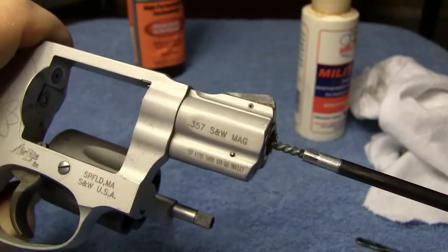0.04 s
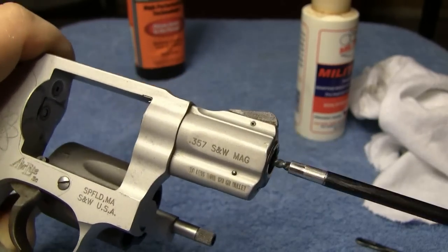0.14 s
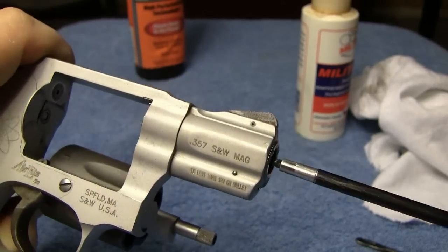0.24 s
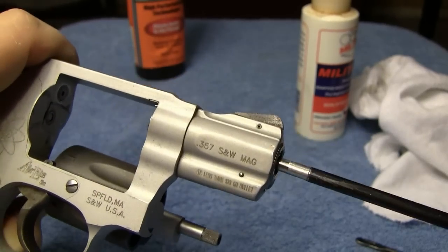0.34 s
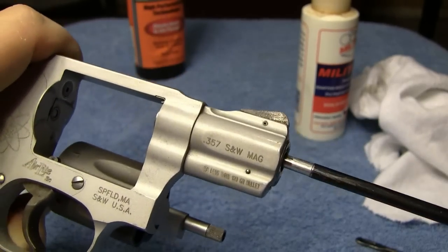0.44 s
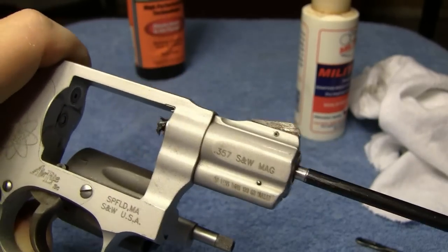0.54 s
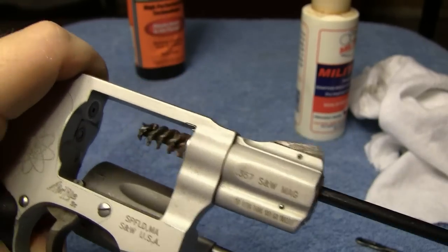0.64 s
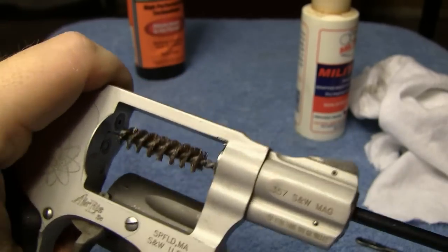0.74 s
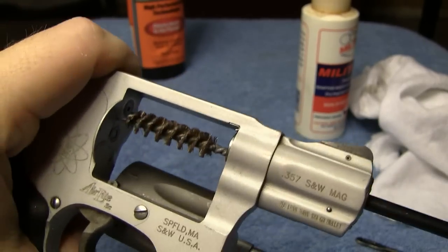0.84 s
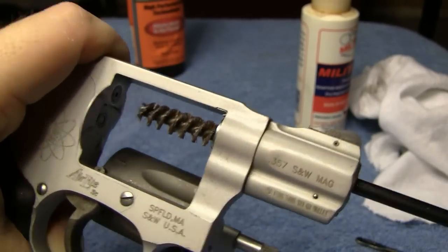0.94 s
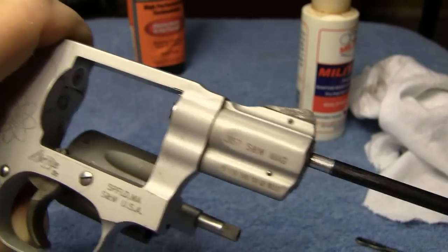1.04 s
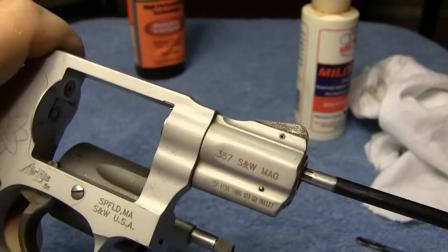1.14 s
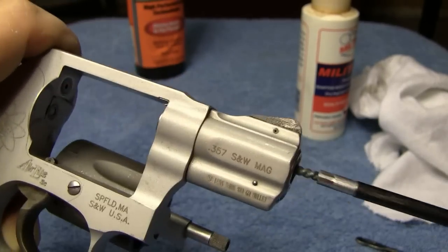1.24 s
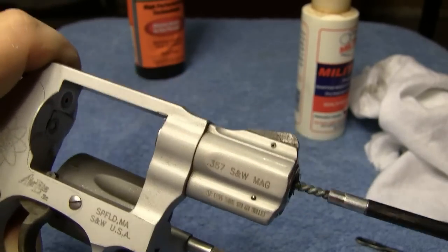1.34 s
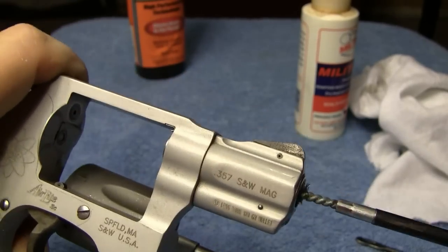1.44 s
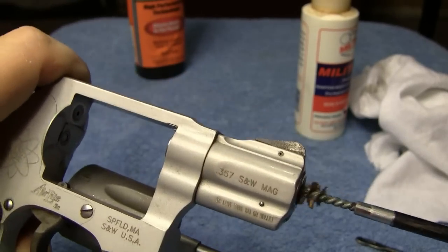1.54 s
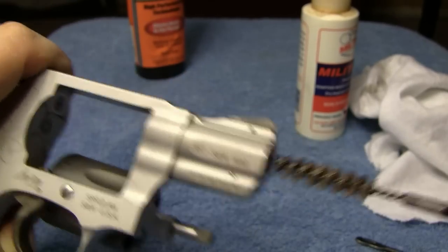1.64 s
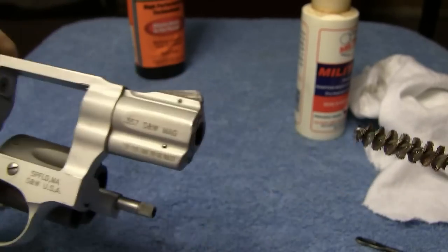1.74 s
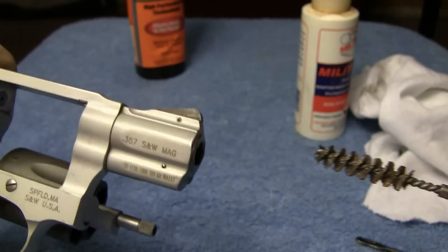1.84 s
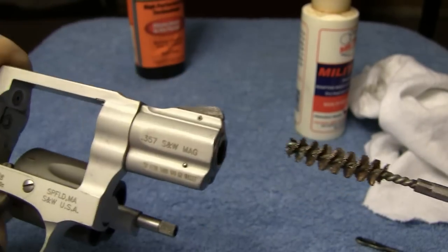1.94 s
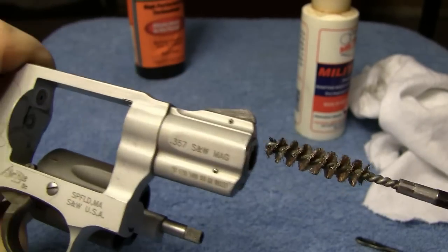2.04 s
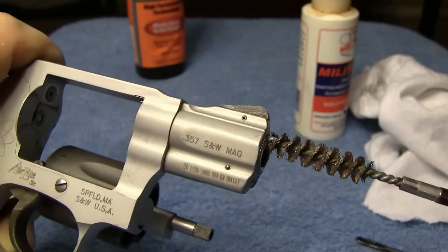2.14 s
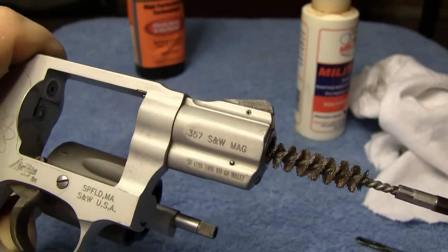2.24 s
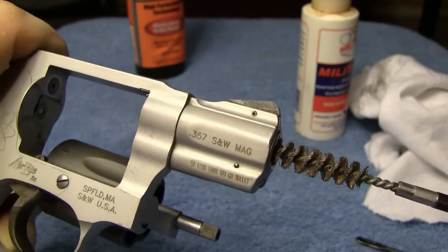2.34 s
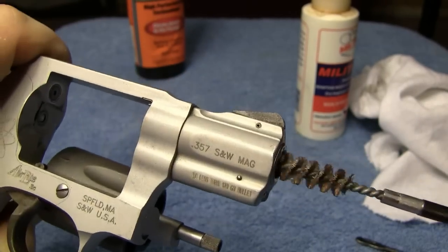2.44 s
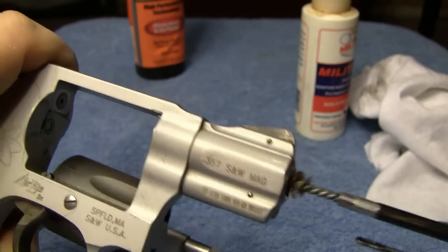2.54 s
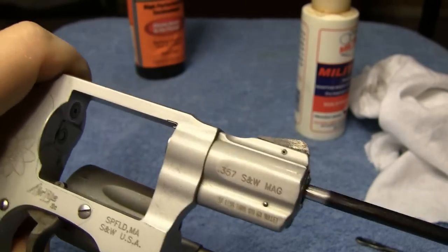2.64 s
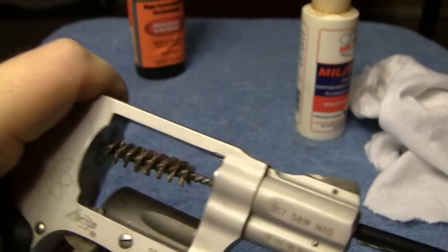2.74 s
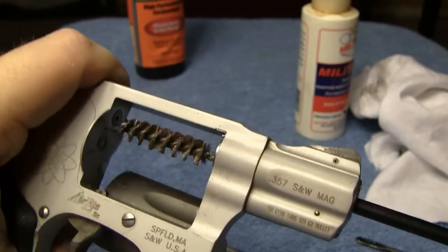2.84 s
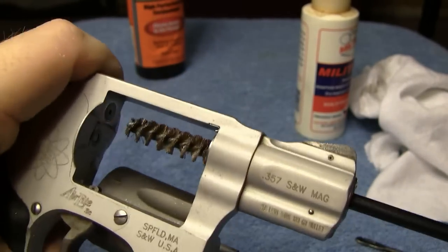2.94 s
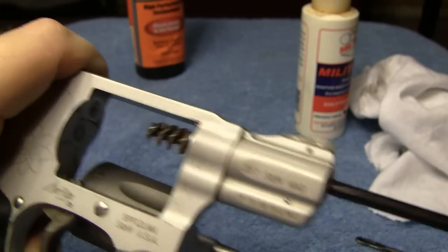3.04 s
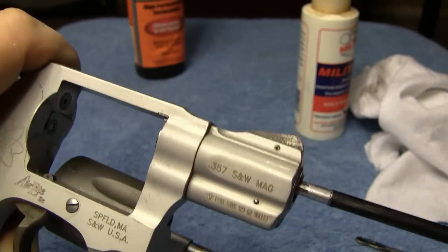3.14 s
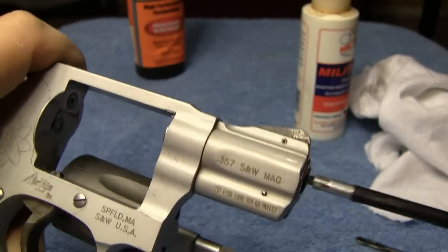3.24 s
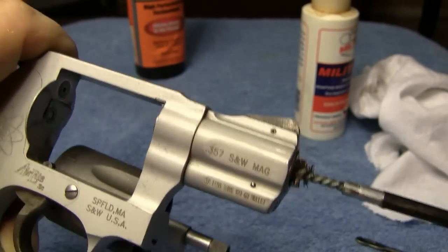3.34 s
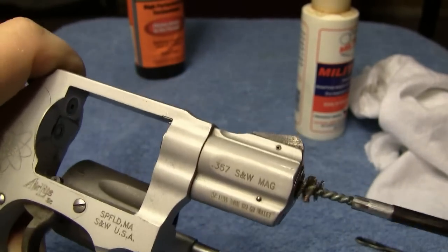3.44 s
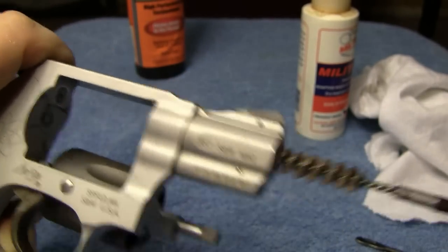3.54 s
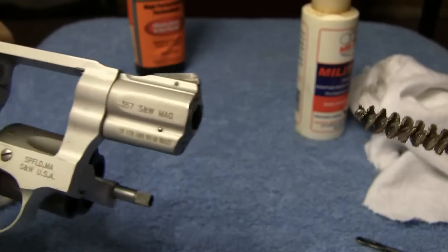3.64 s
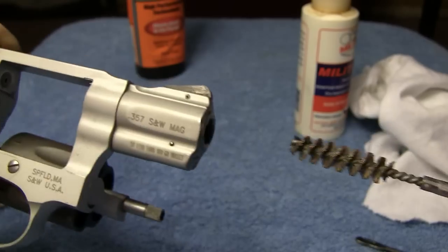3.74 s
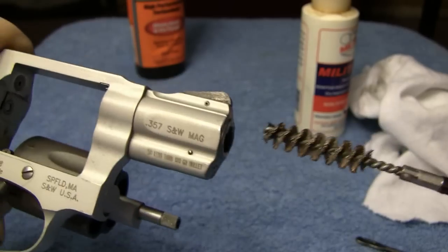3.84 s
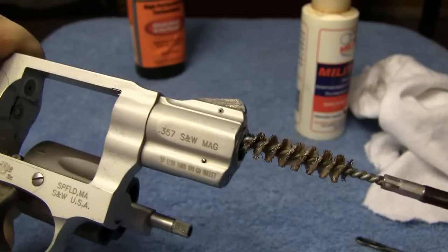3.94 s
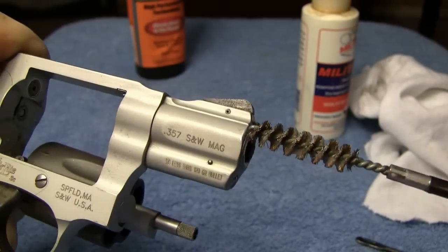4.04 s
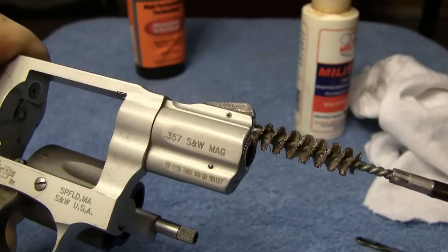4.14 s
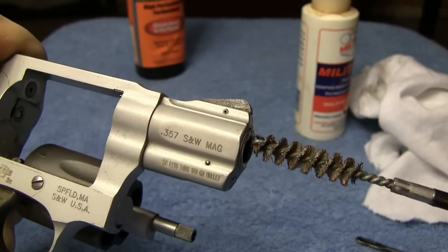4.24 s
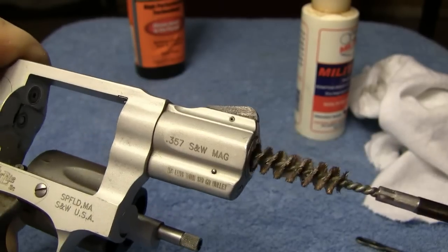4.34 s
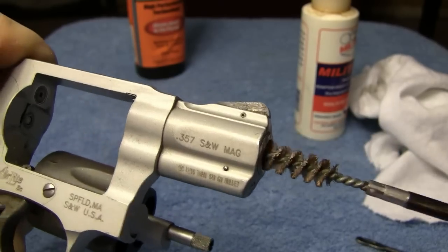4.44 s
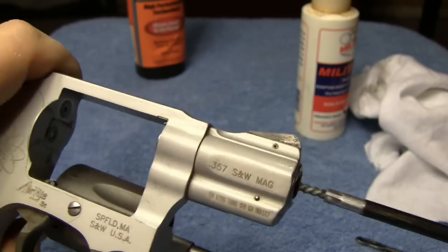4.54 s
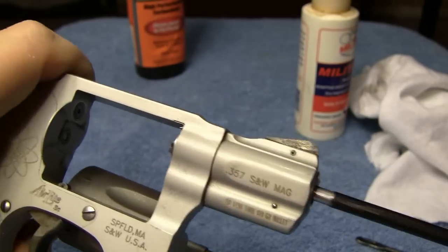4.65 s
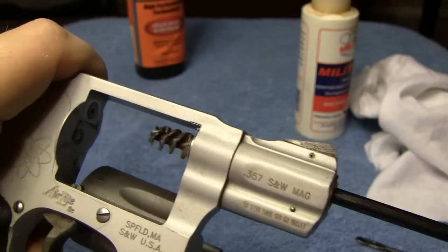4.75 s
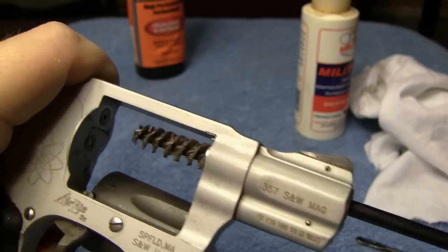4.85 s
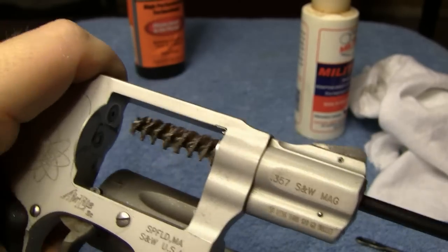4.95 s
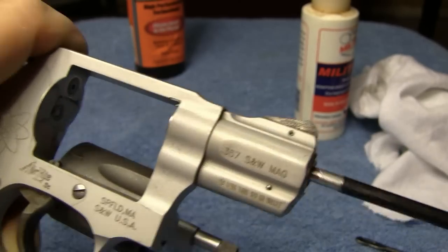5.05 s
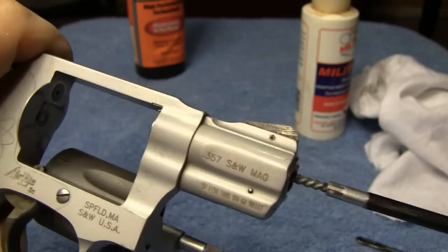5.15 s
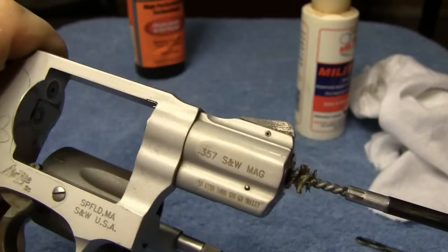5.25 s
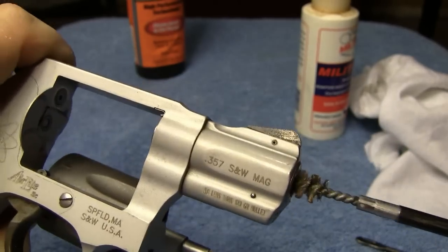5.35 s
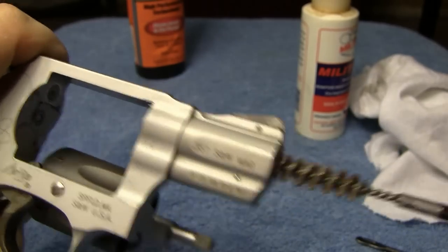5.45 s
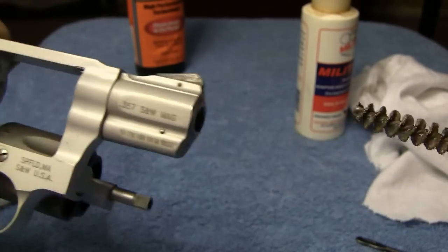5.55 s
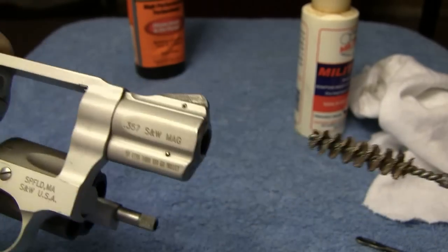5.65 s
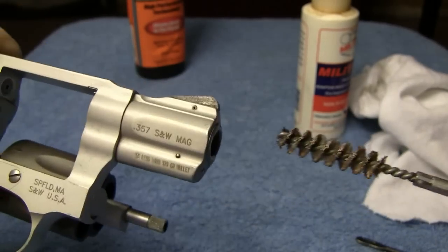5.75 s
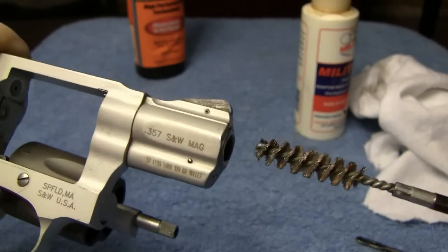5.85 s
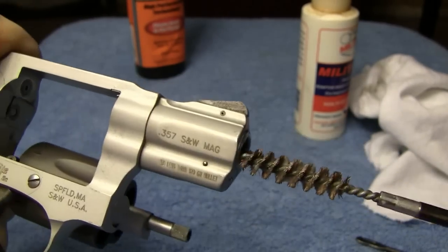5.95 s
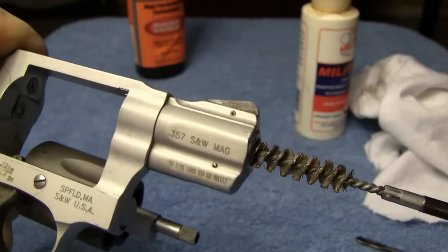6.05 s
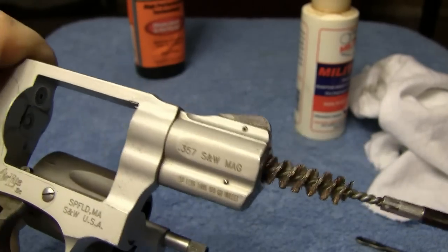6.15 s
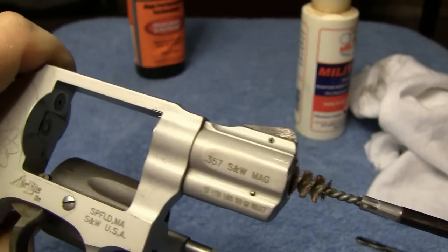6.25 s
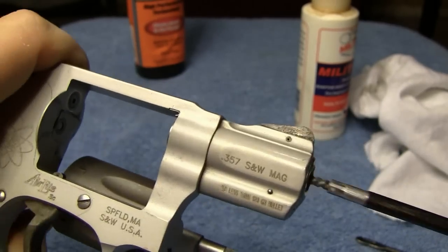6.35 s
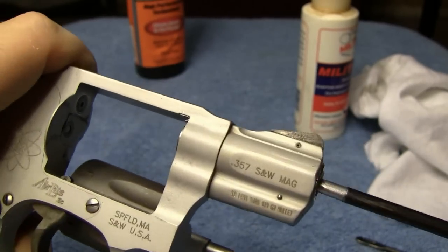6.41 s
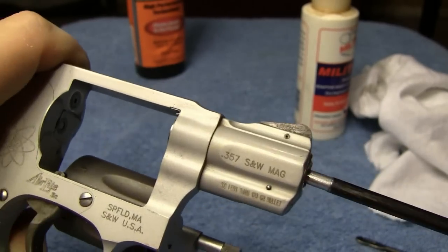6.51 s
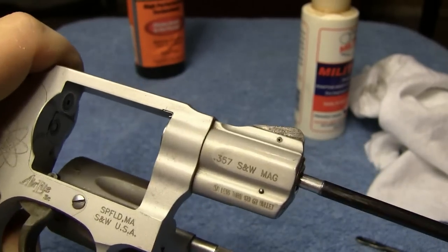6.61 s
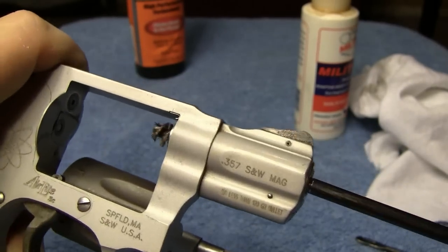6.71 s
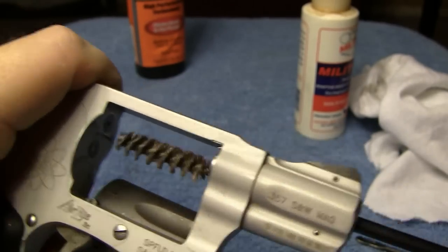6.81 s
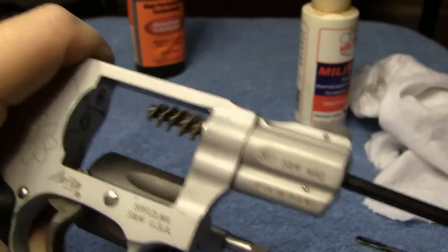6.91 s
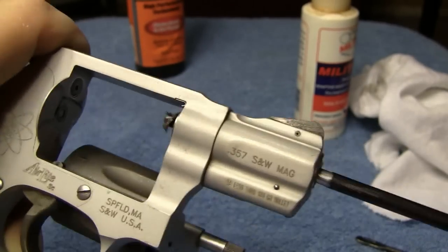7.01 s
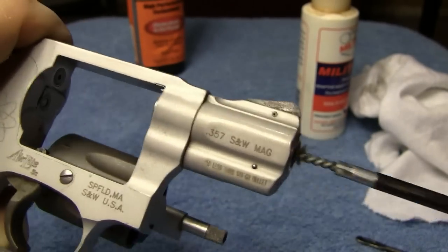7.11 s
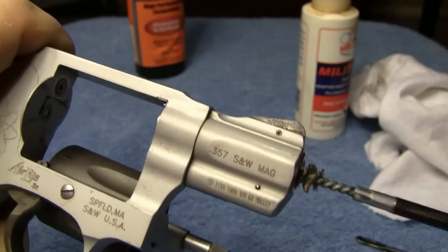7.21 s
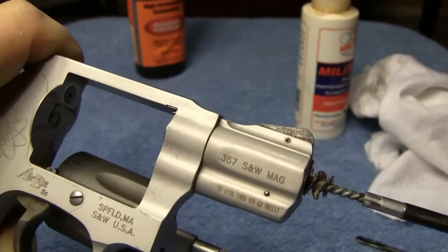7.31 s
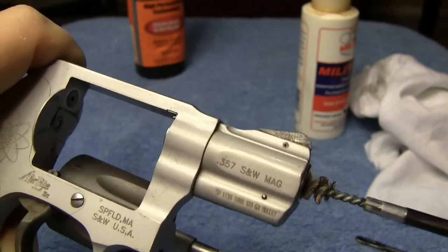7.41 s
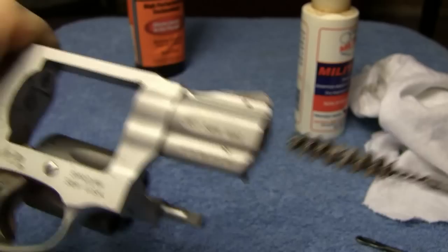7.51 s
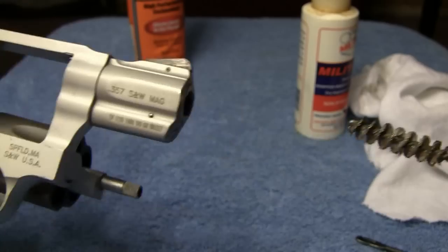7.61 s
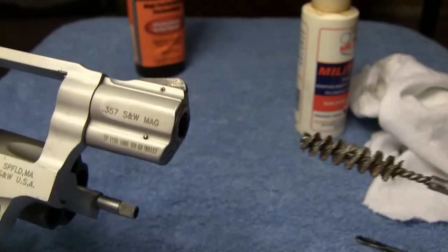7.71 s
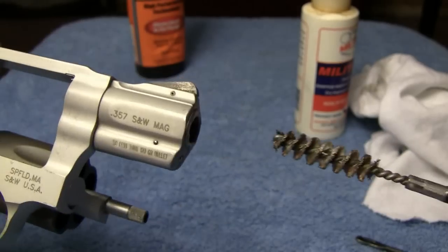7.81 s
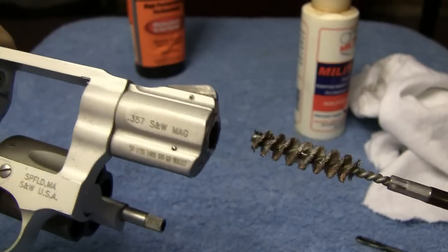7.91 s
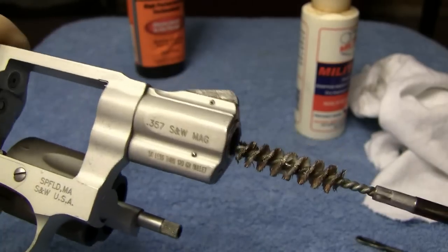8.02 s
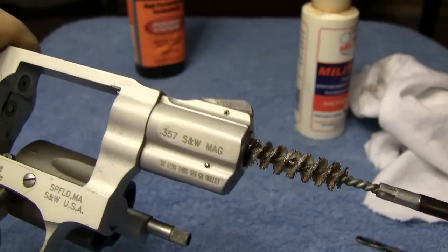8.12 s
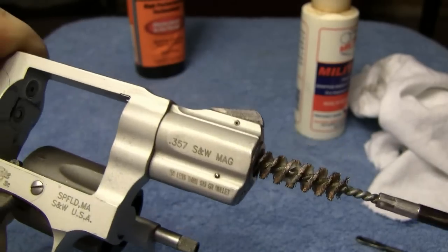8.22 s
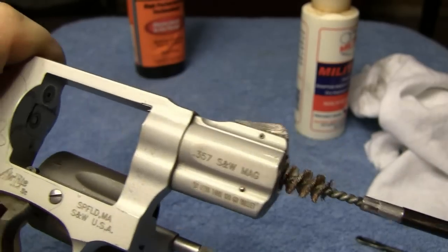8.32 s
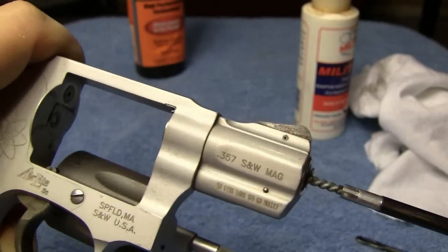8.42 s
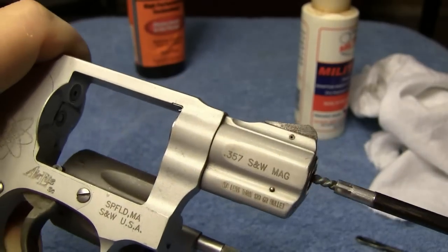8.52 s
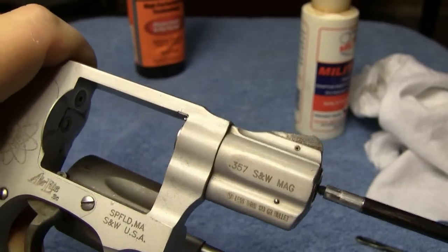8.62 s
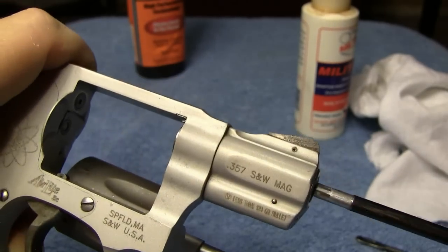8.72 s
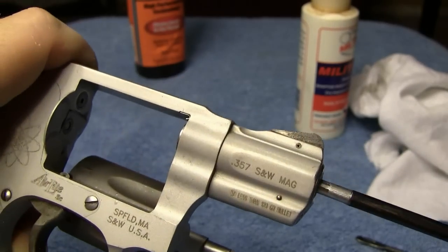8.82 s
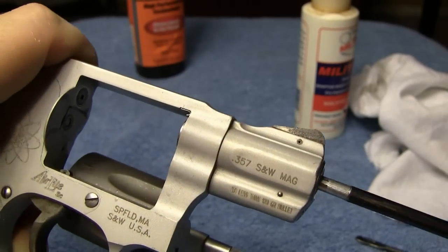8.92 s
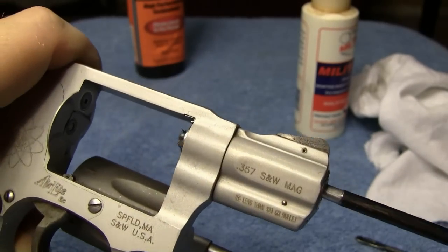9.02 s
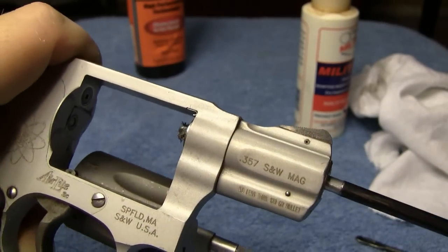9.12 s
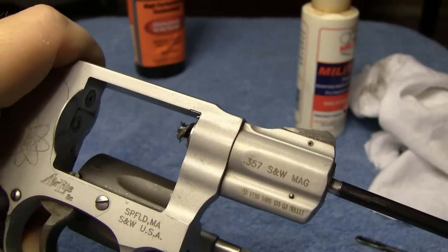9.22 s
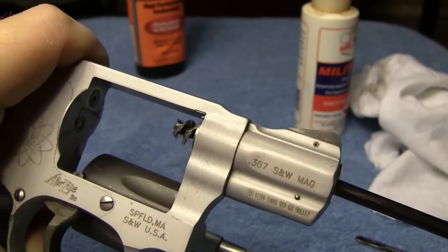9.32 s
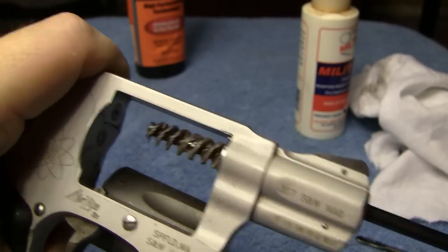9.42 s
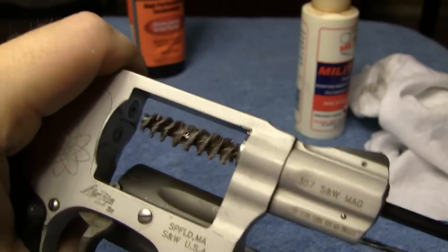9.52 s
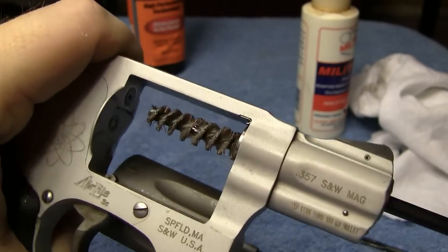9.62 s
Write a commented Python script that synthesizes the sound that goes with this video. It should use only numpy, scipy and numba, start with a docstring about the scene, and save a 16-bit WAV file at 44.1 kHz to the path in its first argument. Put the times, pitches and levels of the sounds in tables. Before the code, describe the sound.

Close, bright scratchy strokes of a bristle brush scrubbing a revolver barrel, bristles snapping free at each end, rod clicking on steel.

```python
"""In a small quiet room, close by, a wire bore brush on a rod is pushed through a short steel revolver barrel
and drawn out again. Thousands of random bristle slips, coloured and ringing, make the hiss and rasp of each stroke.
At either end bristles snap over the edge and ring the air in the tube, a resonance that glides with the brush.
Rod and brush tip knock on the steel as bursts of short decaying modes; freed bristles ring out.
Filtered noise and wavering sines lie underneath as room rumble and a faint mains hum."""
import sys
import numpy as np
from scipy import signal
from scipy.fft import rfft, irfft
from scipy.io import wavfile
from numba import njit

SR = 44100
rng = np.random.default_rng(int(sys.argv[2]) if len(sys.argv) > 2 else 0)


def transcribe(u):
    """Save the signal u as a 16-bit wav file named by the first command-line argument.

    u: samples, shape (n,) or (channels, n), limited to [-1, 1]; the rate is SR.
    q: integer samples, one column per channel.
    """
    v = np.clip(np.atleast_2d(u).T, -1, 1)
    q = np.round(v * 32767).astype(np.int16)
    wavfile.write(sys.argv[1], SR, q)


N = 426447
TIME = np.arange(N) / SR   # seconds

# stereo width of the room's air: hz, side_minus_mid_db
AIR_WIDTH = [(60, -15), (125, -4), (250, 0), (500, 6), (1000, 3.5), (2000, -3), (10000, -0.5)]
# colour of the bristle hiss: hz, level_db (relative, per Hz)
WIRE_COLOUR = [(2940, -31.5), (5000, -14), (5330, -15), (5960, -10.5), (7710, -3.5), (8540, -4), (9790, -2),
               (10700, -4), (12000, -2.5), (14100, -15), (15200, -12.5), (16000, -25)]
# the brush is drawn back: sinks_into_rear_s, leaves_muzzle_s, snaps_going_in_db, snaps_coming_out_db
PULLS = [(1.059, 1.739, -46, -23), (3.134, 3.651, -26, -21.5), (5.056, 5.554, -29, -22),
         (7.013, 7.599, -27, -23.5)]
# the tip works its way into the muzzle: first_touch_s, brush_sinks_in_s, scratching_db
ENTRIES = [(2.34, 2.531, -52.5), (4.405, 4.511, -46), (6.133, 6.26, -48.5), (8.151, 8.343, -49)]
PLUG_S = 0.06   # the full brush squeezes into the muzzle


def from_db(db):
    """Decibels to gain."""
    return 10 ** (np.asarray(db) / 20)


def rms_one(x):
    """Scale to unit power."""
    return x / np.sqrt(np.mean(x ** 2) + 1e-20)


def at_hz(points, hz):
    """Read a table on a log-frequency axis."""
    f, value = np.transpose(points)
    return np.interp(np.log(np.maximum(hz, 1)), np.log(f), value)


def colour(x, spectrum):
    """Filter by a table of hz and level_db."""
    size = 2 ** 14 * (N // 2 ** 14 + 1)   # zero-padded to an easy transform length
    gain = from_db(at_hz(spectrum, np.fft.rfftfreq(size, 1 / SR)))
    filtered = irfft(rfft(x.astype(np.float32), size) * gain.astype(np.float32), size)
    return filtered[..., :N].astype(float)


def high_pass(x, hz):
    """Small objects radiate little below their size."""
    sos = signal.butter(2, hz, "high", fs=SR, output="sos")
    return signal.sosfilt(sos, x + 1e-18)   # the tiny offset keeps silence cheap to compute


def stereo(pair, width):
    """Two unrelated signals become the common and the differing part of left and right."""
    return pair[0] + colour(pair[1], width) * np.array([[1], [-1]])


def drift(rate):
    """Random curve of unit power, with `rate` new targets a second joined by straight lines."""
    knots = rng.standard_normal(int(N / SR * rate) + 2)
    return rms_one(np.interp(TIME * rate, np.arange(len(knots)), knots))


def ramp(x):
    """Smooth step from 0 to 1."""
    return np.sin(np.pi / 2 * np.clip(x, 0, 1)) ** 2


@njit
def glide(x, pull, r):
    """A two-pole resonance whose tuning term (pull) moves from sample to sample."""
    y = np.zeros(x.shape)
    for c in range(x.shape[0]):
        for i in range(2, x.shape[1]):
            y[c, i] = x[c, i] - x[c, i - 2] + pull[i] * y[c, i - 1] - r * r * y[c, i - 2] + 1e-18
    return y


def resonate(x, hz, width_hz):
    """A resonance with gain 1 on top, its centre given for every sample."""
    r = np.exp(-np.pi * width_hz / SR)
    pull = 2 * r * np.cos(2 * np.pi / SR * hz)
    return (1 - r * r) / 2 * glide(np.ascontiguousarray(x), pull, r)


def background(waver_db=4.5, rumble_db=0.5):
    """Gently swelling room rumble from coloured noise, and a mains hum of sines wavering in level and phase."""
    # swell of the rumble, before rumble_db: time_s, level_db
    rumble_swell = [(0, -54.5), (1.9, -56), (2.9, -54.5), (4, -55), (7.1, -54), (8.2, -55.6), (9.67, -54.3)]
    # colour of the rumble: hz, level_db (relative, per Hz)
    rumble_colour = [(15, -62), (25, -35.5), (38, -22.5), (114, -10), (149, -9), (212, -6), (242, -1.5),
                     (270, -6), (326, -5.5), (405, -9), (818, -13.5), (936, -14.5), (1070, -15),
                     (1700, -20), (16000, -43.5)]
    # mains hum: pitch_hz, level_db (before the waver)
    hum_tones = [(120.5, -75.5), (241, -69.5)]
    swell = from_db(rumble_db + np.interp(TIME, *np.transpose(rumble_swell)))
    air = swell * rms_one(colour(rng.standard_normal((2, N)), rumble_colour))
    hum = 0
    for hz, db in hum_tones:
        level = np.sqrt(2) * from_db(db + waver_db * drift(6.5))
        hum = hum + level * np.sin(2 * np.pi * hz * TIME + 0.53 * drift(11.0))
    return stereo(air, AIR_WIDTH) + hum


def slips(per_s, spread_db, size):
    """Random bristle releases of uneven strength: two trains of the same clicks, signs unrelated, unit power."""
    born = rng.random(size) < per_s / SR
    strength = born * from_db(spread_db * np.clip(rng.standard_normal(size), -2, 2))
    return rms_one(strength * rng.choice([-1, 1], (2, size)) / np.sqrt(per_s))


def stroke_levels(unsteady_db=1.55, catch_db=1.0):
    """Gains of hiss and rasp: each stroke speeds up, swells or fades, and stops; the bristles catch unevenly."""
    # each shove or tug of the rod, levels before the gains below:
    # start_s, end_s, hiss_at_middle_db, swell_start_to_end_db, extra_rasp_db
    strokes = [(-0.029, 0.079, -43.5, 7.5, 0.5), (0.061, 0.167, -41.5, -4.5, 1.5),
               (0.132, 0.266, -32.5, 5.0, -1.5), (0.258, 0.379, -34.5, 1.5, -2.5),
               (0.322, 0.456, -38, -0.5, -1), (0.487, 0.569, -35.5, -2, -2), (0.545, 0.823, -32.0, 6.5, -1),
               (1.007, 1.17, -25.5, 19, -2.5), (1.169, 1.405, -35.5, 24.5, -2),
               (1.479, 1.748, -38.5, 33.5, 0), (2.442, 2.575, -41.0, 4.5, 0),
               (2.547, 2.866, -27.0, 5.5, -2.5), (3.083, 3.209, -19.5, 12, 1),
               (3.192, 3.446, -38.5, 48.5, -1.5), (3.459, 3.656, -37.5, 35, 4.5),
               (4.362, 4.56, -48.5, -0.5, -1.5), (4.505, 4.907, -31, -3, -1.5),
               (4.842, 5.033, -38.5, -19.5, 0.5), (5.006, 5.185, -26.5, 21.5, 0),
               (5.142, 5.362, -32.5, -21.5, -0.5), (5.378, 5.56, -32.5, 20.5, 3.5),
               (6.208, 6.548, -31.5, 9.5, -0.5), (6.662, 6.935, -36, 36, 2),
               (6.917, 7.086, -36.0, 43.5, -1.5), (7.066, 7.273, -25.5, 0, -1),
               (7.447, 7.608, -30.5, 20.5, 6.5), (8.272, 8.553, -35.0, 8, 1),
               (8.487, 8.785, -42.5, 6, -0.5), (8.753, 8.905, -44, -2.5, 1), (8.883, 8.985, -42, 3, 0.5),
               (8.993, 9.16, -41, 19.5, 1.5), (9.18, 9.442, -52.5, -11, 0.5),
               (9.351, 9.568, -32.0, 12.5, 2.5)]
    hiss_db = 1.5   # gain of all strokes
    speed_up_s, slow_down_s = 0.1, 0.084   # the hand gets the rod moving and stops it
    let_go_s = 0.029   # a stroke stops faster when the brush leaves the muzzle
    # the rasp keeps step with the hiss in slow strokes and grows less above the knee
    rasp_knee_db, rasp_growth = -47, 0.3
    power = np.zeros((2, N))
    for start, end, db, swell_db, rasp_db in strokes:
        during = slice(max(int(start * SR), 0), int(end * SR))
        t = TIME[during]
        comes_free = any(abs(end - leaves) < slow_down_s for _, leaves, _, _ in PULLS)
        stop_s = let_go_s if comes_free else slow_down_s
        swell = swell_db * ((t - start) / (end - start) - 0.5)
        motion = ramp((t - start) / speed_up_s) * ramp((end - t) / stop_s)
        hiss = from_db(hiss_db + db + swell) * motion
        rasp = from_db(rasp_db) * hiss * (1 + hiss / from_db(rasp_knee_db)) ** (rasp_growth - 1)
        power[:, during] += np.square([hiss, rasp])
    return np.sqrt(power) * from_db([unsteady_db * drift(40), catch_db * drift(90)])


def bore_pitch(wobble=0.013):
    """The air in the barrel rings high while the brush is at either end and low while the brush fills it."""
    # the tip comes out at the rear: time_s
    through_s = [.775, 2.785, 4.87, 6.875, 9.21]
    # centre pitches, before the wobble: brush at the muzzle, just plugging it, filling the bore, out at the rear
    muzzle_hz, plugged_hz, filled_hz, rear_hz = 3064, 1750, 2282, 3176
    nosing_sag_hz = 232   # the pitch sags while the tip works its way in
    clear_s, unplug_s = 0.042, 0.038   # glides across the rear edge and out of the muzzle
    path = []
    for touch, sunk, _ in ENTRIES:
        path += [(touch, muzzle_hz), (sunk, muzzle_hz - nosing_sag_hz), (sunk + PLUG_S, plugged_hz)]
    for through in through_s:
        path += [(through - clear_s, filled_hz), (through, rear_hz)]
    for sunk, leaves, _, _ in PULLS:
        path += [(sunk, rear_hz), (sunk + clear_s, filled_hz)]
        path += [(leaves - unplug_s, filled_hz), (leaves, muzzle_hz)]
    return np.interp(TIME, *np.transpose(sorted(path))) * (1 + wobble * drift(30))


def bore(x, overtones_db, damping, undertone_db=0.0):
    """The air column follows the depth of the brush, whose bristles damp it; white input keeps its power."""
    # air in the bore: multiple_of_its_resonance, width_hz (before damping), level_db (relative)
    air_modes = [(.66, 452, -17), (1.0, 313, 7), (1.97, 480, -9.5), (3.85, 900, -11.5)]
    pitch = bore_pitch()
    out, power = 0, 0
    for multiple, width, db in air_modes:
        is_overtone, is_undertone = multiple > np.sqrt(2), multiple == air_modes[0][0]
        gain = from_db(db + overtones_db * is_overtone + undertone_db * is_undertone)
        out = out + gain * resonate(x, multiple * pitch, width * damping)
        power += gain ** 2 * np.pi * width * damping / SR
    return out / np.sqrt(power)


def scrub(slips_per_s=16000, rasp_db=0.0, bore_db=0.0, sing_db=-4.5, sing_growth=0.42, sing_hz=9800,
          sing_width_hz=1700, sing_wander=0.028, judder_db=1.2):
    """Bristles slip along the rifling: the faster the stroke, the denser the slips and the more the wires sing."""
    # colour of the barrel's rasp: hz, level_db (relative, per Hz)
    rasp_colour = [(650, -54), (1100, -17), (1360, -12.5), (1810, 0), (2210, 1), (2770, 2.5), (4300, -0.5),
                   (4850, -25.5), (5320, -3.5), (6000, -14), (7800, -32), (13200, -120)]
    hiss, rasp = stroke_levels()
    speed = np.clip(hiss / from_db(-29.0), 0.06, 2)   # relative, read off the stroke's loudness
    grains = slips(slips_per_s * speed, spread_db=3.0, size=N) * from_db(judder_db * drift(170))
    wires = rms_one(colour(grains, WIRE_COLOUR))
    # the pitch of the wires wanders as they bend
    wire_hz = sing_hz * (1 + sing_wander * drift(14))
    singing = rms_one(resonate(wires, wire_hz, sing_width_hz))
    sing = from_db(sing_db) * speed ** sing_growth
    wires = (wires + sing * singing) / (1 + sing)
    wall = from_db(rasp_db) * rms_one(colour(grains, rasp_colour))
    air_slips = slips(slips_per_s / 2, spread_db=2.0, size=N)
    air = from_db(bore_db) * bore(air_slips, overtones_db=14.5, damping=1.34)
    return hiss * wires + rasp * (wall + high_pass(air, hz=1380))


def rim_crossings():
    """The body of the brush passing over a rim, as start_s, end_s, start_db, end_db, snaps_per_s."""
    # bristles dragged over a rim: start_s, end_s, start_db, end_db
    scrapes = [(0.755, 0.814, -30, -42.5), (2.771, 2.841, -30, -27), (2.856, 3.02, -48, -45.5),
               (4.42, 4.434, -29.5, -42.5), (4.851, 4.872, -36.5, -38.5), (4.904, 4.993, -43, -34.5),
               (6.873, 6.922, -25.5, -31.5), (6.957, 6.988, -43.5, -35.5), (9.229, 9.386, -51, -52.5),
               (9.472, 9.557, -34.5, -28.5), (9.617, 9.655, -39, -51)]
    rim_per_s, pull_per_s = 1300, 1800   # bristle snaps per second
    entry_s, entry_swell_db = 0.036, 11   # crescendo of snaps as the bristles fold into the rear
    exit_s, exit_swell_db = 0.075, 20.5   # and as they unfold from the muzzle
    # low scrape as the full bristles squeeze into the muzzle
    plug_db, plug_fade_db, plug_end_s = -43.5, 2, 0.11
    spells = [(*scrape, rim_per_s) for scrape in scrapes]
    for sunk, leaves, in_db, out_db in PULLS:
        spells.append((sunk - entry_s, sunk, in_db - entry_swell_db, in_db, rim_per_s))
        spells.append((leaves - exit_s, leaves, out_db - exit_swell_db, out_db, pull_per_s))
    for _, sunk, _ in ENTRIES:
        spells.append((sunk + PLUG_S / 2, sunk + plug_end_s, plug_db, plug_db - plug_fade_db, rim_per_s))
    return spells


def edge_snaps(spells, damping, undertone_db, overtones_db, crackle_db, rustle_db=-10.0):
    """Bristles flick over the rim one by one, with a soft rustle between, and ring the air in the barrel."""
    snaps = np.zeros((2, N))
    for start, end, start_db, end_db, per_s in spells:
        at, length = int(start * SR), max(int((end - start) * SR), 64)
        rustle = from_db(rustle_db) * rng.standard_normal((2, length))
        flicks = slips(per_s, spread_db=6.5, size=length) + rustle
        snaps[:, at:at + length] += flicks * from_db(np.linspace(start_db, end_db, length))
    ringing = high_pass(bore(snaps, overtones_db, damping, undertone_db), hz=1402)
    return ringing + from_db(crackle_db) * colour(snaps, WIRE_COLOUR)


def knocks(chatter_s=0.0022, uneven_db=3.5, knock_db=1.0, detune=0.037, crack_db=-14.0):
    """Each knock is a hard touch with brief chatter, ringing the damped steel; the grip shifts its modes."""
    # rod and tip knocking on the steel: time_s, level_db (before knock_db), low_knock_db, bright_tick_db
    hits = [(0.8118, -17, 3, 5), (.887, -25.5, -8.5, -15.5), (.932, -40.5, 3, 0.5),
            (1.026, -42.5, -3, 21.5), (1.05, -25.5, -10, 2), (1.446, -42, -19, 13), (1.544, -35, -11.5, 1),
            (2.1707, -12.5, 4, -3.5), (2.248, -38.5, 2.5, -8.5), (2.828, -4.5, -13, 0),
            (2.8434, -12.5, -7, 8.5), (2.849, -6.5, 6, -3.5), (2.872, -26, -4, -7.5),
            (2.9233, -11, -13.5, 2), (3.002, -31.5, -17, 2), (3.0968, -13, -13, -2.5), (4.0634, -16, 3, -7),
            (4.106, -41.5, -11, 1), (4.152, -38, -2.5, -6), (4.28, -41.5, -14, -3.5), (4.39, -37.5, -11, 5),
            (4.4248, -29, -13, -4.5), (5.036, -22, -13, -11.5), (5.391, -37, -3.5, 1.5),
            (6.048, -23.5, 7.5, 3.5), (6.1425, -36.5, -7.5, 6.5), (6.233, -38.5, -12.5, 4),
            (6.665, -43, -10.5, 7), (6.9125, -14, -6, 5), (6.9163, -13, -4, -1.5), (6.994, -22, -18.5, 0),
            (6.9985, -8.5, -29, 2.5), (7.3177, -41.5, -16, 14.5), (7.345, -47.5, -14, 11.5),
            (7.385, -48, -14.5, 10), (7.425, -39, -11, 6.5), (7.4413, -35.5, -20, 6),
            (9.5455, -9.5, -6.5, 2), (9.6209, -18.5, -14.5, -2.5)]
    # frame and rod, damped by the hand: pitch_hz (before detuning), level_db (relative), t60_s
    steel_modes = [(480, -18, 0.0056), (646, -15, 0.012), (1000, -16.5, 0.014), (1180, -13.5, 0.0081),
                   (1800, -7, 0.011), (2237, -6, 0.01), (2844, -8.5, 0.017), (3530, -4, 0.0059),
                   (3740, -7, 0.008), (4910, -13, 0.0083), (5960, -11.5, 0.00517), (7100, -11.5, 0.0059),
                   (8360, -8, 0.0065), (9070, -6.5, 0.0067), (10780, -6.5, .004), (12300, -18, 0.0036)]
    out, t = np.zeros((2, N)), TIME[:SR // 25]
    hz, mode_db, t60 = np.transpose(steel_modes)
    # how far each mode belongs to the low knock or the bright tick
    low, high = np.clip(np.log2(2000 / hz), 0, 1), np.clip(np.log2(hz / 3800), 0, 1)
    for s, level_db, low_db, bright_db in hits:
        held_hz = hz * (1 + detune * rng.standard_normal(len(hz)))
        modes = np.sin(2 * np.pi * held_hz[:, None] * t) * from_db(-60 * t / t60[:, None])
        uneven = uneven_db * rng.standard_normal((2, len(hz)))
        strength = from_db(mode_db + low * low_db + high * bright_db + uneven)
        ring = (strength * (-1) ** np.arange(len(hz))) @ modes   # neighbouring modes start in opposite sense
        chatter = rng.standard_normal((3, len(t))) * np.exp(-t / chatter_s)
        touch = 0.12 * chatter[2] + (t == 0)   # one click, then chatter
        touch = touch / np.linalg.norm(touch)
        hit = signal.fftconvolve(ring, touch[None], axes=1)[:, :len(t)]
        hit += from_db(crack_db + bright_db) * chatter[:2]
        at = int(s * SR)
        out[:, at:at + len(t)] += from_db(level_db + knock_db) * hit[:, :N - at]
    return high_pass(out, hz=213)


def quiver(centre_hz=2720, scatter=0.11, count=100, quiver_db=-40, t60_s=0.2):
    """Once free, the bent bristles ring out, each at a pitch of its own."""
    out, t = np.zeros((2, N)), TIME[:SR // 2]
    for _, leaves, _, _ in PULLS:
        hz = centre_hz * (1 + scatter * rng.standard_normal((count, 1)))
        tones = np.sin(2 * np.pi * (hz * t + rng.random((count, 1))))
        wires = rng.standard_normal((2, count)) @ tones
        at = int(leaves * SR)
        out[:, at:at + len(t)] += rms_one(wires) * from_db(quiver_db - 60 * t / t60_s)
    return out


def nosing_in(snaps_per_s=480):
    """Light scratching of the tip in the muzzle, as start_s, end_s, start_db, end_db, snaps_per_s."""
    return [(touch, sunk, db, db, snaps_per_s) for touch, sunk, db in ENTRIES]


def room(x, wet_db=-20.0, delay_s=0.0078):
    """A faint diffuse tail of noise bands, each with its own decay, the longest in the bass."""
    # colour of the tail: hz, level_db (relative)
    tail_colour = [(200, 3), (1000, -3.5), (2700, -4.5), (5000, -3.5), (10000, -1), (15000, -10)]
    # decay of the tail: hz, t60_s
    tail_decay = [(200, 0.78), (2500, 0.14), (8000, 0.21), (15000, 0.16)]
    t, tail = TIME[:SR // 2], 0
    edges = np.geomspace(150, 16000, 9)
    for low, high in zip(edges, edges[1:]):
        hz = np.sqrt(low * high)
        band_pass = signal.butter(2, [low, high], "band", fs=SR, output="sos")
        band = signal.sosfilt(band_pass, rng.standard_normal((2, len(t))))
        tail = tail + band * from_db(at_hz(tail_colour, hz) - 60 * t / at_hz(tail_decay, hz))
    tail = tail * (t > delay_s)
    tail = from_db(wet_db) * tail / np.linalg.norm(tail[0])
    return stereo(signal.fftconvolve(x[None], tail, axes=1)[:, :N], AIR_WIDTH)


def scene():
    """Brush and barrel close by, the room behind; the empty bore rings more sharply than the filled one."""
    # stereo width of the close sounds: hz, side_minus_mid_db
    brush_width = [(500, -22.5), (1300, -22.5), (2400, -41.5), (4400, -15.5), (8100, -9.5), (11000, -5.5),
                   (15000, -1.5)]
    # balance of the close sounds: hz, left_minus_right_db
    brush_balance = [(2500, -0.5), (8500, -1), (12500, 0.1)]
    body = edge_snaps(rim_crossings(), damping=0.93, undertone_db=7.0, overtones_db=2.0, crackle_db=-15.0)
    tip = edge_snaps(nosing_in(), damping=0.62, undertone_db=12.0, overtones_db=3.5, crackle_db=-8.0)
    work = scrub() + body + knocks() + quiver() + tip
    left, right = stereo(work, brush_width)
    close = np.array([colour(left, brush_balance), right])
    return close + room(work[0]) + background()


def record(dry):
    """A steep elliptic low-pass cuts the top."""
    cutoff_hz = 15900
    return signal.sosfilt(signal.ellip(12, 0.1, 80, cutoff_hz, fs=SR, output="sos"), dry)


dry = scene()
out = record(dry)
transcribe(out)
```